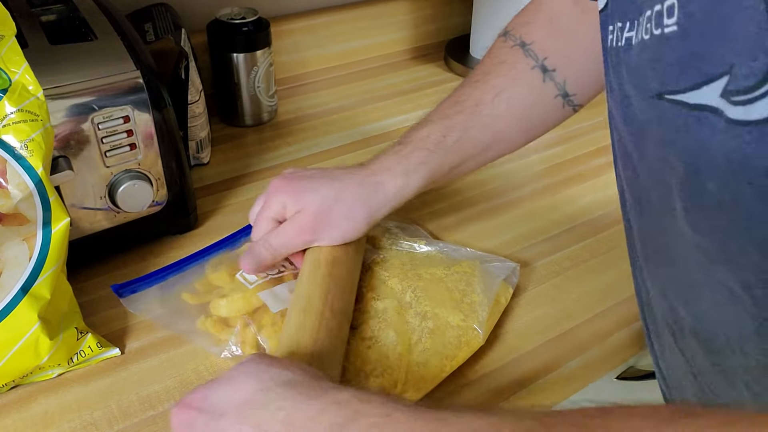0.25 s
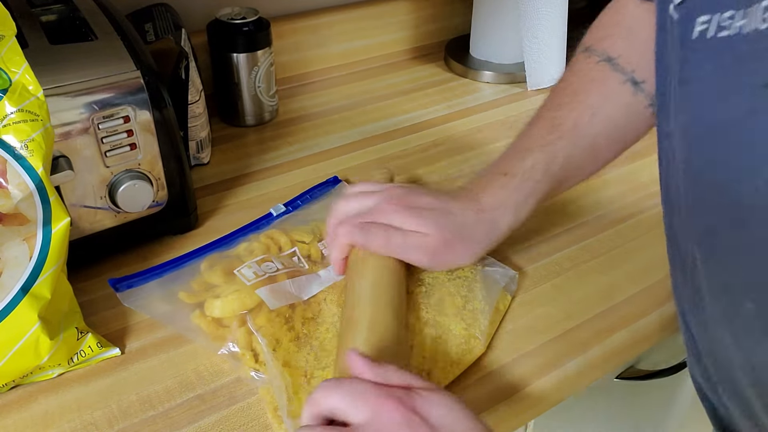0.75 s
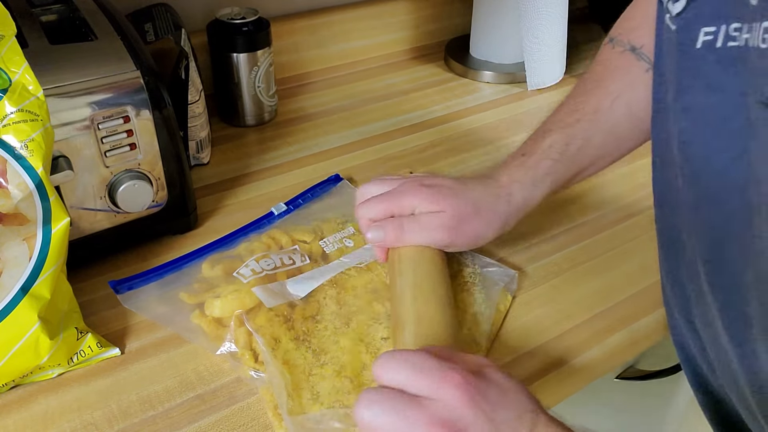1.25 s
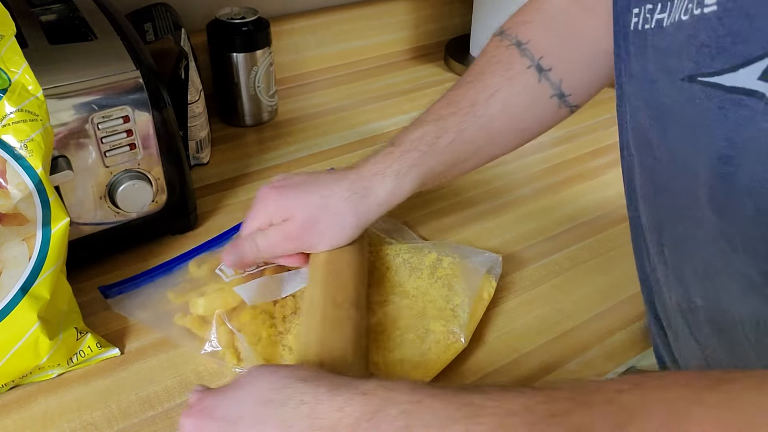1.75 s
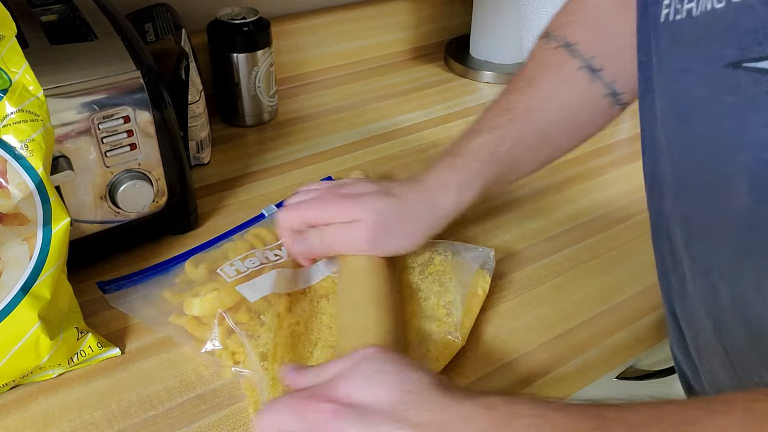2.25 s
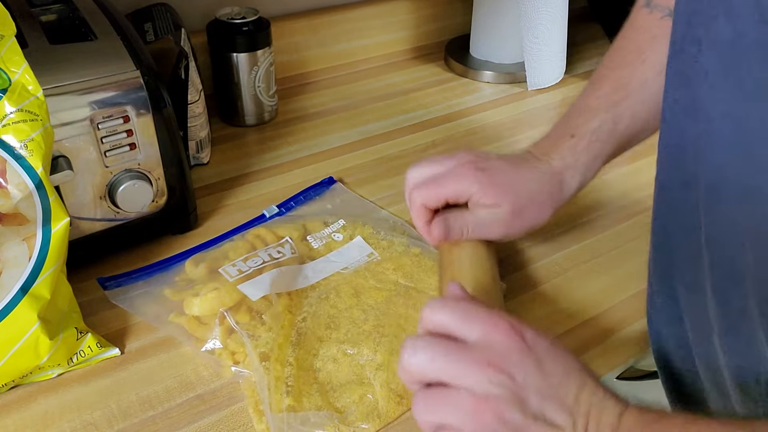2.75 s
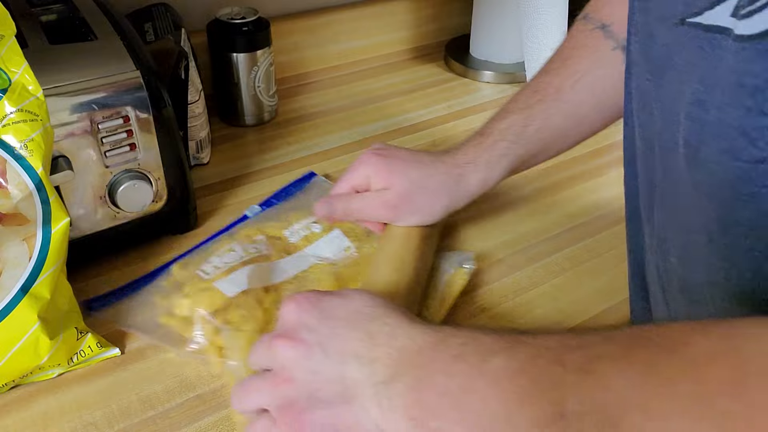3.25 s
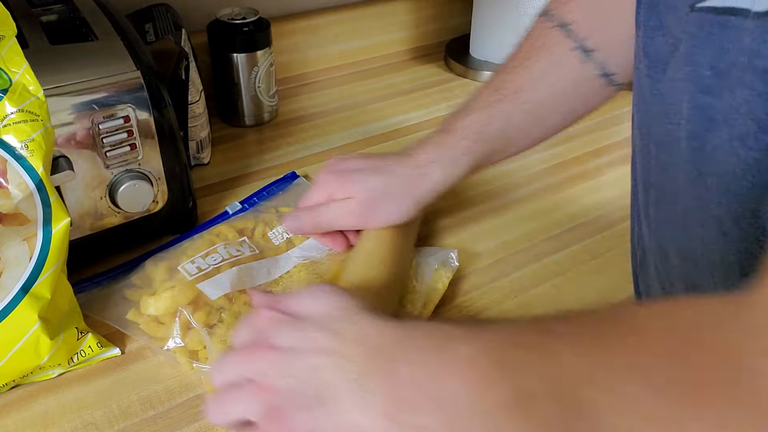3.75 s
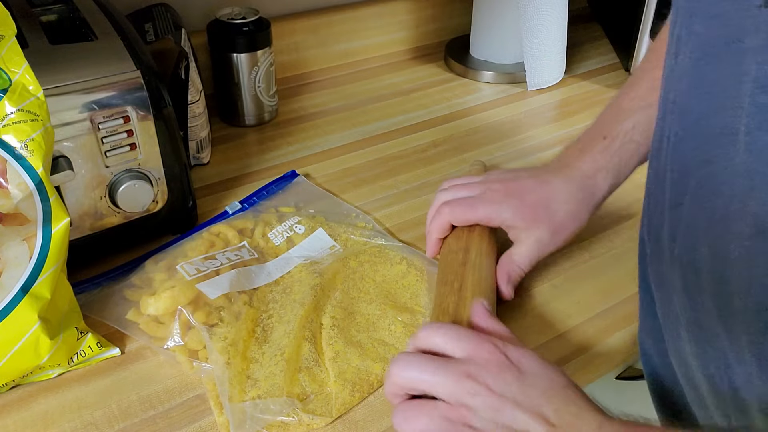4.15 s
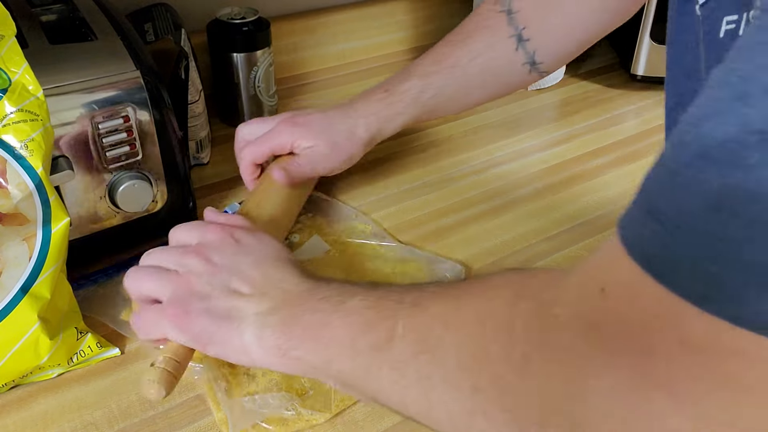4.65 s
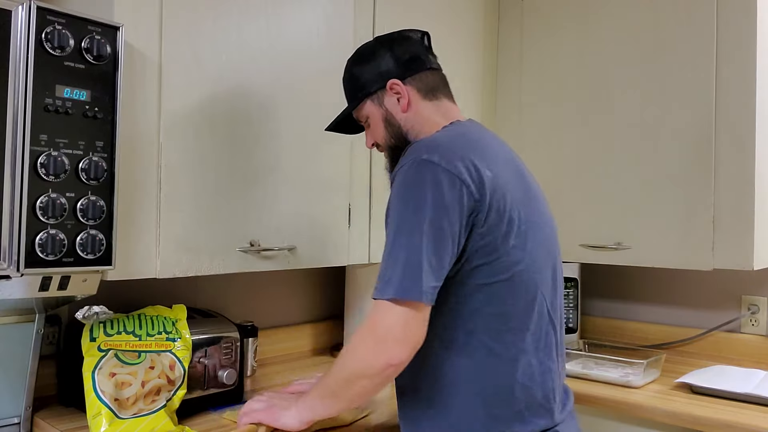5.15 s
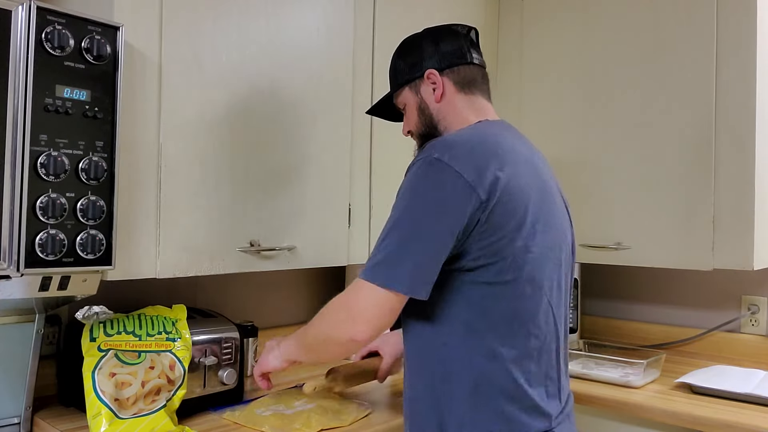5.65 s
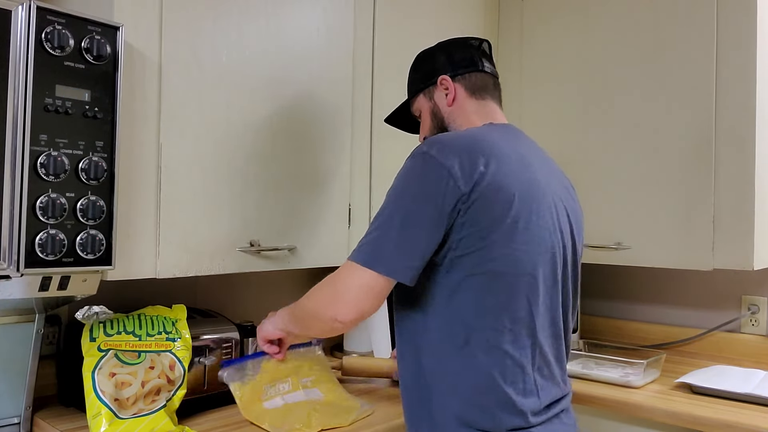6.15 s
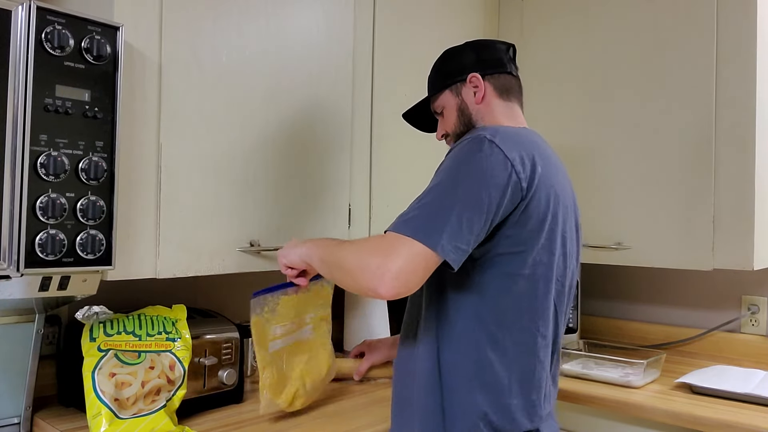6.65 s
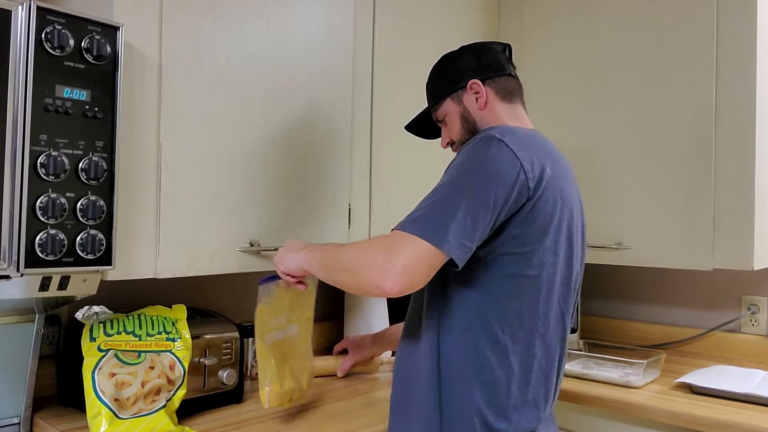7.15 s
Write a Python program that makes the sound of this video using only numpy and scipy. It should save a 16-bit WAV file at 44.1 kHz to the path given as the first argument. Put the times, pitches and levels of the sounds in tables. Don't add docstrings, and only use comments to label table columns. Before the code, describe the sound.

Brittle snacks crackle wide and dry as a rolling pin grinds them through plastic film, stroke after stroke for about two seconds. Loud wooden blows follow, with shorter crunches between them, then a brief final press. A faint lull with soft bumps leads to rustling bag shakes and tumbling crumbs, interrupted by a woody double knock. Small microphones sit close to the counter in a short, blurred room.

```python
import sys
import numpy as np
from scipy import signal
from scipy.fft import rfft, irfft
from scipy.io import wavfile
from scipy.ndimage import uniform_filter1d

SR = 44100
rng = np.random.default_rng(int(sys.argv[2]) if len(sys.argv) > 2 else 0)


def volts(x):
    e = np.asarray(x, float) / 20
    return 10 ** e


def dump_mix(stems):
    frames = np.atleast_2d(stems).T
    limited = np.clip(frames, -1, 1)
    pcm = np.round(limited * 32767).astype(np.int16)
    wavfile.write(sys.argv[1], SR, pcm)


N = 326781
CLOCK_S = np.arange(0, N / SR + .002, .001)

# frequency in Hz, density in dB per Hz.
CRUNCH = [(150, -36), (300, -14.5), (600, -13.5), (1060, -14), (1740, -11), (2670, -13), (4000, -19.5),
          (5500, -23.5), (7200, -30.5), (8500, -51.5), (16000, -93.5)]
# frequency in Hz, density in dB per Hz.
FILM = [(5000, -22.5), (7400, -6.5), (8000, 3.5), (9840, 3.5), (12500, 1.1), (15000, 1), (16500, -2.5)]
# frequency in Hz, density in dB per Hz.
HISS = [(35, -36), (60, -1), (217, 1), (323, -11), (1010, -14.5), (2300, -12), (5330, -27.5), (16000, -36)]
HISS_DB = -76

# frequency in Hz, level in dB, t60 in seconds.
BOOM = [(90.3, -4, 0.13), (113.4, 2.5, 0.091), (140, -6, 0.23), (159.4, -1.5, 0.22), (202, 0, 0.14),
        (247.4, 0, 0.099)]
# frequency in Hz, level in dB, t60 in seconds.
RING = [(331.4, -3, 0.11), (364.8, -2.5, 0.11), (394.2, 0.5, 0.089), (437, -2, 0.16), (499, -3.5, 0.089),
        (558.4, -7, 0.11), (621.5, -7.5, 0.078), (723, -7.5, 0.055), (809, -7.5, 0.063), (931.4, -8, 0.08),
        (1136, -10, 0.041), (269, -9, 0.063)]
# frequency in Hz, level in dB, t60 in seconds.
CLACK = [(693, -2.5, 0.054), (880, -3, 0.021), (1160, -4.5, 0.034), (1420, -8.5, .03), (1600, -4.5, .006),
         (1850, -11.5, 0.026), (2350, -8.5, 0.044), (2600, -9, .008), (3020, -19, 0.013),
         (5040, -24.5, .02)]
# frequency in Hz, level in dB, t60 in seconds.
RUB_BANDS = [(804.4, 2.5, .02), (1180, 4, 0.018), (2410, -9, 0.021), (3179, -20, .02)]
# start in seconds, full in seconds, end in seconds.
RUB_S = (4.522, 4.545, 4.65)
RUB_DB = -55
# start in seconds, full in seconds, end in seconds, level in dB, frequency in Hz, t60 in seconds.
CREAKS = [
    (5.675, 5.7, 5.75, -67, 460, .12),
    (2.69, 2.7, 2.712, -58, 2560, .02),
    (4.208, 4.218, 4.235, -56, 2520, .012),
    (6.834, 6.838, 6.846, -32, 2400, .02),
    (5.81, 5.825, 5.85, -61, 1600, .006),
]

# time in seconds, peak in dB, pitch in Hz, left minus right in dB.
SNAPS = [(0.2614, -14, 3407, 0), (0.2994, -11, 1750, -4.5), (0.876, -25, 1940, -1),
         (0.9406, -23.5, 2520, -3), (0.5192, -24, 1560, 0), (0.566, -15, 1090, -1), (1.1406, -24, 1455, 0),
         (1.1777, -22, 2670, 0), (1.2233, -20, 1990, 0), (1.715, -14, 2900, 0), (1.75, -13, 2500, 0),
         (2.0853, -28.5, 2010, 0), (2.1026, -19, 1100, 0), (2.5011, -17, 2160, 0),
         (2.5666, -25, 2140, -0.5), (2.6349, -34, 1670, 0), (2.9377, -20.5, 2380, 0),
         (3.0607, -25, 1960, 0), (3.4895, -18, 1100, 0), (3.7199, -26, 1520, 0), (4.6597, -28, 1920, 0),
         (4.9871, -17.5, 1490, 0), (5.015, -17, 1500, 0), (6.7076, -23, 1532, 0), (1.129, -38, 1520, 3),
         (1.146, -17.5, 2270, 11), (1.6244, -15, 3060, -0.5), (1.696, -17, 2110, 1.5),
         (2.152, -14.5, 1344, -4), (2.2408, -22, 2160, 2.5), (2.727, -33, 1900, 4.5), (0.99, -40, 2000, 0),
         (2.7586, -34, 1550, -3), (2.7795, -20, 4960, 10), (3.1896, -13.5, 1690, -2),
         (3.3807, -21.5, 2260, 0), (3.8835, -17.5, 1967, 0), (4.0254, -9.5, 1450, 3),
         (4.142, -17, 1205, 3.0), (4.678, -22, 1720, 1.5), (4.717, -16, 1840, 6), (4.7623, -14, 1766, 1),
         (4.8095, -19, 2150, 1.5), (4.823, -15, 1710, -1), (5.0888, -12, 2045, 7), (6.0447, -20, 2208, 4),
         (6.0716, -15.5, 2270, 10), (6.5745, -16, 1530, 0), (7.0335, -16, 1475, 1.5),
         (7.1729, -12.5, 2350, 4), (7.3194, -18, 2170, 0)]
# time in seconds, peak in dB, left minus right in dB.
TICKS = [(0.2314, -13, 5), (0.7608, -19.5, 3.5), (0.771, -14, 3.5), (1.1435, -25, -1), (1.2226, -31, -1),
         (1.3074, -27, 1.0), (1.5628, -24, 1.0), (1.6244, -14.5, 6), (1.6906, -21, -3), (1.715, -16, 8),
         (1.904, -14.5, 1.0), (1.925, -11.5, 1.5), (1.9736, -13, 1.0), (2.0742, -28, 0.0), (2.092, -14, 9),
         (2.2474, -16, 4), (2.778, -33, 4), (2.9367, -20.5, 8), (3.3775, -28, 0.5), (3.4146, -27, -0.5),
         (3.4366, -25, 1.0), (3.7399, -24, 4.5), (4.011, -23, 0), (4.114, -33, 0), (4.659, -39, 0),
         (4.762, -23, 0), (0.94, -38, 0), (4.714, -21.5, 3), (4.813, -27, 2.5), (4.9746, -24.5, 2.5),
         (4.9866, -18.5, 4), (6.2715, -36, 4), (6.574, -17, 2.5), (7.1716, -26, 2.0)]
# time in seconds, ring peak in dB, thud in Hz, clack minus ring in dB, contact in ms.
BLOWS = [(1.959, -16.5, 107, 0, 16), (2.7771, -2.5, 140, -2.5, 12.4), (2.809, -10.5, 173, -9, 16),
         (2.848, -15.5, 228, -2.5, 24), (2.888, -22, 200, -4, 20), (4.0256, -5.5, 147, 1, 21.8),
         (4.143, -10, 148, -2.5, 12), (4.219, -23.5, 182, -8, 6.1), (4.83, -15, 174.5, -0.5, 37.5),
         (6.833, -10, 250, -9, 34.3), (6.924, -7.5, 170.3, -4.5, 35.6), (6.931, -6.5, 215, -4, 12)]
THUD_DB, THUD_DB_PER_MS = -19, 0.5
# time in seconds, thud peak in dB, thud in Hz, ring minus thud in dB.
BUMPS = [(1.15, -31, 190, -7), (1.185, -28, 92.3, -15), (2.124, -21, 145.6, 0.5), (4.555, -37, 216.5, -19),
         (4.578, -47, 200, -6), (4.728, -18, 115, -4), (5.433, -29, 110, -8), (5.459, -28, 87.99, -18.5),
         (5.893, -23.5, 104, -30), (5.915, -24, 111, -18), (6.578, -26.5, 183.5, -7),
         (7.389, -24, 180.2, -2)]
BUMP_MS, BUMP_CLACK_DB, BUMP_ATTACK_S = 13, -6, .008

# bite in seconds, level then in dB under the peak, peak in seconds,
# peak crunch in dB, lift in seconds.
ROLLS = [(-0.05, 1, 0.077, -21, 0.27), (0.24, -4, 0.34, -22, 0.46), (0.5, -9.5, 0.6, -22, 0.8),
         (0.74, -3, 0.8, -26, 0.875), (1.17, -14.5, 1.447, -23, 1.644), (1.65, -6, 1.68, -23.5, 1.932),
         (1.86, -5, 1.87, -24.5, 2.047), (2.085, -8.5, 2.234, -22.5, 2.522), (2.92, -10, 3.18, -29, 3.314),
         (3.385, -2, 3.461, -27, 3.625), (3.715, -7.5, 3.69, -28, 3.9), (3.8, -5.5, 3.97, -26, 4.05),
         (4.8, -4, 4.74, -27, 4.87), (4.94, -11, 5.03, -23.5, 5.26)]
ROCKS = [(0.44, -2.5, 0.44, -40, 0.56), (0.8, -1, 0.83, -36, 0.9), (1.16, -3, 1.23, -37, 1.24),
         (4.53, -7.5, 4.56, -58, 4.4), (5.3, -3, 5.43, -41, 5.62), (5.9, -4, 5.93, -41, 6.0),
         (4.06, -2, 4.11, -28, 4.18), (3.5, -8, 3.6, -34, 3.7), (4.2, -2, 4.22, -41.5, 4.25),
         (4.66, -9, 4.72, -33.5, 4.73), (5.26, -2, 5.2, -46.5, 5.3), (5.54, -7, 5.565, -48, 5.45),
         (5.64, -2.5, 5.75, -69, 6.019), (6.0, -5, 6.02, -49, 6.14), (6.2, -6, 6.3, -44, 6.4),
         (6.49, -13, 6.57, -37, 6.5), (6.68, -7, 6.72, -37, 6.1), (6.84, 0, 6.93, -29, 7.12),
         (7.02, -3, 6.6, -36, 6.1), (7.16, -1, 7.2, -35, 7.3), (7.33, -6, 7.4, -33.5, 7.4)]
SHUDDERS = [
    (4.05, -3, 4.04, -37.5, 4.22),
    (4.26, -2, 4.28, -60, 4.33),
    (5.76, -6, 5.7, -62, 5.5),
    (5.99, -2, 6.0, -50, 6.06),
    (6.86, -6, 6.94, -33, 7.2),
    (7.05, -2, 7.1, -42, 7.3),
    (0.45, -2, 0.5, -41, 0.56),
    (2.0, -2.5, 2.03, -38, 2.1),
    (2.9, -2, 2.93, -42, 3.06),
    (3.5, 0, 3.56, -37.5, 3.65),
]
JOLTS = [(0.939, -1, 0.943, -40, 0.975), (1.13, -8.5, 1.15, -28, 1.1), (2.727, -4.5, 3.7, -50, 2.755),
         (2.778, 0, 2.8, -28.5, 3), (4.025, -2, 4.07, -31, 4.17), (4.144, -6, 4.16, -38, 4.25),
         (4.57, -16, 4.655, -51, 5), (4.659, -10, 4.69, -27, 5), (5.805, -3, 5.83, -60, 6),
         (5.917, -9, 5.975, -30.5, 6), (7.165, 0, 7.175, -22, 7)]
SLIDES = [
    (2.633, -2, 2.636, -48.5, 2.67),
    (2.758, -6, 2.775, -46.5, 2.79),
    (4.757, -3, 4.7, -26, 4.72),
    (5.26, 9, 5.31, -35, 5.403),
    (5.42, 1, 5.46, -37.5, 5.55),
    (5.68, -1, 5.6, -65, 5.95),
]
SHAKES = [
    (6.05, -7, 6.085, -29, 6.2),
    (6.2, -8, 6.295, -32.5, 6.31),
    (6.43, -26.5, 6.585, -19, 6.69),
    (6.69, -5.5, 6.755, -24.5, 6.84),
    (6.85, -3.5, 6.905, -25.5, 7.0),
    (6.99, -7, 7.045, -24, 7.123),
    (7.16, 2.5, 7.2, -27.5, 7.27),
    (7.08, -2, 7.11, -32, 7.17),
    (7.24, -2, 7.27, -34, 7.33),
    (7.295, -9, 7.333, -24.5, 7.39),
]

ROLL_BRAKE, RUSTLE_BRAKE = 2.9, 1.28
ROLL_BITE_DB_PER_S, RUSTLE_BITE_DB_PER_S, SHAKE_BITE_DB_PER_S = 500.5, 2500, 300
ROLL_LIFT_DB_PER_S, RUSTLE_LIFT_DB_PER_S = 160.5, 40
ROLL_BOOM_DB, ROLL_RING_DB = -13, -4
RUSTLE_BOOM_DB, RUSTLE_RING_DB = -33.5, -23.5
ROLL_FILM_DB, FILM_DB_PER_S = -14, 0.62
JOLT_FILM_DB, SLIDE_FILM_DB, SHAKE_FILM_DB = -18.5, -12, -16
BRIGHT_HZ, BRIGHT_DB_PER_DB, BRIGHT_AT_DB = 3000, 0.12, -25
JOLT_BRIGHT_DB, SLIDE_BRIGHT_DB, SHAKE_BRIGHT_DB = -2.5, 2, 0
SHARDS_PER_S, SHARD_HZ, SHARD_OCTAVES, SHARD_CYCLES, SHARD_SPREAD_DB = 500, 2302, .55, 13.1, 3.5
ROLL_SHARD_DB, JOLT_SHARD_DB, SLIDE_SHARD_DB, SHAKE_SHARD_DB = -8, -10, -11, -10.5

ROOM_T60_S, ROOM_TREBLE_T60_S, WET_DB = 0.23, 0.14, -0.5
# start in seconds, return in seconds, level in dB.
DROPOUT = (4.787, 4.81, -26)
TOP_HZ = 15900


def at(s):
    return int(np.clip(s * SR, 0, N - 1))


def unit(x):
    return x / np.sqrt(np.mean(x ** 2))


def colour(x, points):
    hz, db = np.transpose(points)
    grid = np.arange(1, 1026) * SR / 2050
    cepstrum = irfft(np.interp(np.log(grid), np.log(hz), db) * np.log(10) / 20)
    cepstrum[1:1024] *= 2
    cepstrum[1025:] = 0
    taps = irfft(np.exp(rfft(cepstrum)))[:1024]
    return signal.fftconvolve(x, taps / np.linalg.norm(taps))[:N]


def modes(x, table, stretch=1):
    out = 0
    for k, (hz, db, t60) in enumerate(table):
        pole = np.exp(2j * np.pi * hz / SR - np.log(1000) / (t60 * stretch * SR))
        out = out + (-1) ** k * volts(db) * signal.lfilter([1], [1, -pole], x).imag
    return out


def flicker(rate):
    hold = int(SR / rate)
    steps = np.repeat(rng.standard_normal(N // hold + 1), hold)
    return uniform_filter1d(steps, hold)[:N]


def fractures(rate, spread_db, patchy_db, most_db=13):
    draw = rng.random((3, N))
    size_db = np.minimum(-spread_db * np.log(1 - draw[1]), most_db)
    size = volts(size_db) * np.sign(draw[2] - .5)
    return (draw[0] < rate / SR) * size * volts(patchy_db * flicker(30))


def effort(moves, bite_db_per_s=RUSTLE_BITE_DB_PER_S, brake=RUSTLE_BRAKE, lift_db_per_s=RUSTLE_LIFT_DB_PER_S):
    power = 1e-12
    for start, start_db, peak, db, down in moves:
        rise = np.interp(CLOCK_S, [start - .5, start, peak], [start_db - bite_db_per_s * .5, start_db, 0])
        fall = 10 * (np.maximum(CLOCK_S - peak, 0) / max(down - peak, .005)) ** brake
        fall = fall + lift_db_per_s * np.maximum(CLOCK_S - down, 0)
        power = power + volts(db + rise - np.minimum(fall, 200)) ** 2
    return power


def level_db(*parts):
    power = sum(p * volts(db) ** 2 for p, db in parts)
    return np.interp(np.arange(N) / SR, CLOCK_S, 10 * np.log10(power))


def scattered(clicks, points, t60, wet_db):
    sides = clicks * (0.41 + 0.72 * rng.standard_normal((2, N)))
    keep = volts(-120 / t60 / SR)
    early = np.exp(-1 / (0.0058 * SR))
    power = signal.lfilter([1 - keep], [1, -keep], clicks ** 2)
    power = signal.lfilter([1 - early], [1, -early], power)
    mix = sides + volts(wet_db) * np.sqrt(np.abs(power)) * rng.standard_normal((2, N))
    return np.array([colour(side, points) for side in mix]) / np.hypot(1, volts(wet_db))


def room(x, wet_db, alike):
    t = np.arange(SR // 2) / SR
    noise = rng.standard_normal((3, len(t)))
    tails = alike * noise[2] + np.sqrt(1 - alike ** 2) * noise[:2]
    low = signal.lfilter(*signal.butter(1, 2000, fs=SR), tails)
    tails = low * volts(-60 * t / ROOM_T60_S) + (tails - low) * volts(-60 * t / ROOM_TREBLE_T60_S)
    tails *= np.minimum(t / 0.0026, 1)
    tails *= volts(wet_db) / np.sqrt(np.sum(tails ** 2, axis=1, keepdims=True))
    tails[:, 0] += 1
    return signal.fftconvolve(x[None], tails / np.hypot(1, volts(wet_db)), axes=1)[:, :N]


def background_hiss():
    sides = [unit(colour(noise, HISS)) for noise in rng.standard_normal((2, N))]
    return np.array(sides) * volts(HISS_DB + 1.0)


def crushing(crunch_db, film_db, bright_db):
    surge_db = crunch_db + 1.5 * flicker(50) + 0.7 * flicker(150)
    crumbs = unit(fractures(4000, spread_db=2.5, patchy_db=2.0)) * volts(surge_db + 1.0)
    film = unit(fractures(4100, spread_db=2.5, patchy_db=0.0, most_db=9.5)) * volts(surge_db + film_db + 4.5)
    crunch = scattered(crumbs, CRUNCH, ROOM_T60_S, WET_DB)
    dull = signal.filtfilt(*signal.butter(2, BRIGHT_HZ, fs=SR), crunch)
    crunch = dull + (crunch - dull) * volts(bright_db)
    return crunch + scattered(film, FILM, ROOM_TREBLE_T60_S, WET_DB + 1.0)


def counter(boom_db, ring_db):
    boom = unit(modes(fractures(400, spread_db=2.5, patchy_db=2), BOOM))
    ring = unit(modes(fractures(1200, spread_db=4, patchy_db=-0.5), RING))
    return volts(boom_db + 9) * boom, volts(ring_db + 3.5) * ring


def shards(db):
    count = 4000
    draw = rng.random((4, count))
    start = (draw[0] * N).astype(int)
    octaves = SHARD_OCTAVES * rng.standard_normal(count)
    hz = np.clip(SHARD_HZ * 2 ** octaves, 700, 7000)[:, None]
    size = volts(db[start] + np.minimum(-SHARD_SPREAD_DB * np.log(1 - draw[1]), 12))
    size *= draw[2] < SHARDS_PER_S * N / SR / count
    k = np.arange(500)
    cycles = hz * k / SR
    ring = size[:, None] * np.sin(2 * np.pi * cycles) * volts(-60 * cycles / SHARD_CYCLES / 2)
    turn = draw[3, :, None] * np.pi / 2
    where = (start[:, None] + k).ravel()
    sides = [np.bincount(where, (ring * w).ravel(), N + 500)[:N] for w in (np.cos(turn), np.sin(turn))]
    return np.array(sides)


def place(out, s, db, pan_db, burst):
    sides_db = db + np.array([[pan_db], [-pan_db]]) / 2
    out[:, at(s):at(s) + 600] += volts(sides_db) * burst / np.abs(burst).max()


def film_ticks():
    out, t = np.zeros((2, N + 600)), np.arange(600) / SR
    for s, db, pan_db in TICKS:
        burst = rng.standard_normal((2, 600)) * np.exp(-t / .0012)
        place(out, s, db + 2.5, pan_db, burst)
    return np.array([colour(side, FILM) + 0.44 * colour(side, CRUNCH) for side in out])


def snaps():
    out, t = np.zeros((2, N + 600)), np.arange(600) / SR
    for s, db, hz, pan_db in SNAPS:
        burst = rng.standard_normal(600) * np.exp(-t / 0.0023)
        crack = modes(burst, [(hz, 0, .003), (1.75 * hz, -6, .0015)])
        place(out, s, db - 2.5, pan_db, crack)
    return out[:, :N]


def rocking():
    hum = unit(modes(fractures(500, spread_db=3.5, patchy_db=3), BOOM[2:] + RING[-1:] + RING[:6], 0.65))
    deep = unit(modes(rng.standard_normal(N), BOOM[:2], 1.1))
    rock_db = level_db((effort(ROCKS), 3.0))
    shudder_db = level_db((effort(SHUDDERS, ROLL_BITE_DB_PER_S), 0))
    return volts(rock_db) * hum + volts(shudder_db) * deep


def new_spot(table, pitch_spread, spread_db):
    return [(hz * (1 + pitch_spread * rng.standard_normal()), db + spread_db * rng.standard_normal(), t60)
            for hz, db, t60 in table]


def knocks():
    boom, ring = np.zeros((2, N + SR))
    t = np.arange(SR // 3) / SR
    hits = [(s, db, THUD_DB + THUD_DB_PER_MS * ms, hz, clack_db, ms, 1) for s, db, hz, clack_db, ms in BLOWS]
    hits += [(s, db + ring_db, -ring_db, hz, BUMP_CLACK_DB, BUMP_MS, 0) for s, db, hz, ring_db in BUMPS]
    for s, db, thud_db, hz, clack_db, ms, hard in hits:
        attack_s = 0.002 if hard else BUMP_ATTACK_S
        push = rng.standard_normal(len(t)) * np.minimum(t / attack_s, 1) * np.exp(-t / (ms / 1000))
        if hard:
            push[:12] += 2.5
        else:
            push += 0.25 * np.sin(2 * np.pi * hz * t) * (t < 2.5 / hz)
        thud = modes(push, [(hz, 0, .22), (1.2 * hz, -5, .12)]) + 0.37 * modes(push, BOOM)
        rung = modes(push, new_spot(RING[:10], 0.031, 3.55), 0.56)
        clack = modes(push, new_spot(CLACK, .05, 0))
        for out, part, rel_db in ((boom, thud, thud_db), (ring, rung, 0), (ring, clack, clack_db)):
            out[at(s):at(s) + len(t)] += volts(db + rel_db - 0.5) * part / np.abs(part).max()
    return boom[:N], ring[:N]


def rub():
    out, t = 0, np.arange(N) / SR
    slips = [(*RUB_S, RUB_DB, RUB_BANDS)]
    slips += [(start, full, end, db, [(hz, 0, t60)]) for start, full, end, db, hz, t60 in CREAKS]
    for start, full, end, db, bands in slips:
        press = np.interp(t, [start, full, end, end + (full - start)], [0, 1, 1, 0])
        out = out + volts(db) * press * unit(modes(rng.standard_normal(N), bands))
    return out


def scene():
    roll = effort(ROLLS, ROLL_BITE_DB_PER_S, ROLL_BRAKE, ROLL_LIFT_DB_PER_S)
    jolt, slide, shake = effort(JOLTS), effort(SLIDES), effort(SHAKES, SHAKE_BITE_DB_PER_S)
    bag = jolt + slide + shake
    crunch_db = level_db((roll + bag, 0))
    film_db = level_db((roll, ROLL_FILM_DB + FILM_DB_PER_S * CLOCK_S), (jolt, JOLT_FILM_DB),
                       (slide, SLIDE_FILM_DB), (shake, SHAKE_FILM_DB)) - crunch_db
    bright_db = level_db((roll, 0), (jolt, JOLT_BRIGHT_DB), (slide, SLIDE_BRIGHT_DB),
                         (shake, SHAKE_BRIGHT_DB)) - crunch_db
    bright_db += BRIGHT_DB_PER_DB * np.maximum(crunch_db - BRIGHT_AT_DB, -40)
    shard_db = level_db((roll, ROLL_SHARD_DB), (jolt, JOLT_SHARD_DB), (slide, SLIDE_SHARD_DB),
                        (shake, SHAKE_SHARD_DB)) + 4

    crackle = crushing(crunch_db, film_db, bright_db)
    boom, ring = counter(level_db((roll, ROLL_BOOM_DB), (bag, RUSTLE_BOOM_DB)),
                         level_db((roll, ROLL_RING_DB), (bag, RUSTLE_RING_DB)))
    pieces = shards(shard_db) + film_ticks() + snaps()
    thuds, wood = knocks()

    air = crackle + .5 * pieces + 1.27 * room(pieces.mean(axis=0), WET_DB + 7.5, alike=0.039)
    air = air * volts(np.array([[.6], [-.6]]))
    body = room(boom + thuds + rocking(), WET_DB - 9.5, alike=0.9)
    body = body + room(ring + wood + rub(), WET_DB - 4.5, alike=0.79)
    return air + body + background_hiss()


def roll_off(x):
    return signal.sosfilt(signal.butter(12, 16940, fs=SR, output="sos"), x)


def record(dry):
    gone, back, db = DROPOUT
    gate_db = np.interp(np.arange(N) / SR, [gone - .001, gone, back - .008, back + 0.0041], [0, db, db, 0])
    x = signal.sosfilt(signal.butter(3, 74, "high", fs=SR, output="sos"), dry) * volts(gate_db)
    x = signal.sosfilt(signal.ellip(8, .2, 50, TOP_HZ, fs=SR, output="sos"), x)
    x = np.tanh(0.58 * x) / 0.63
    return roll_off(x)


dry = scene()
out = record(dry)
dump_mix(out)
```